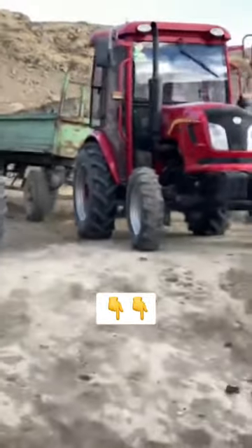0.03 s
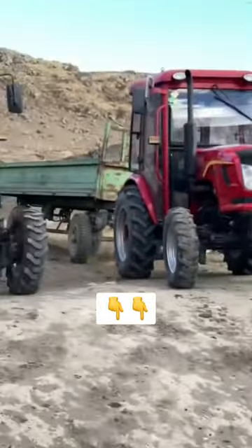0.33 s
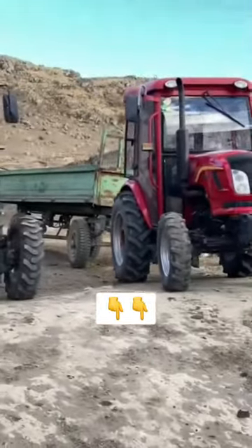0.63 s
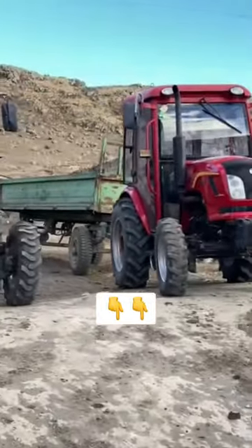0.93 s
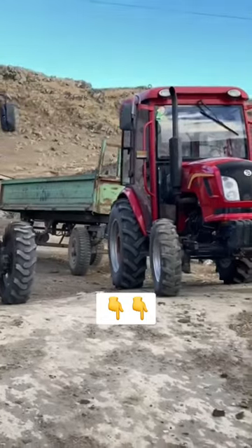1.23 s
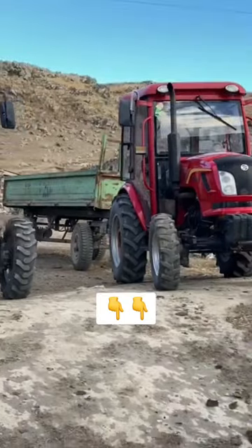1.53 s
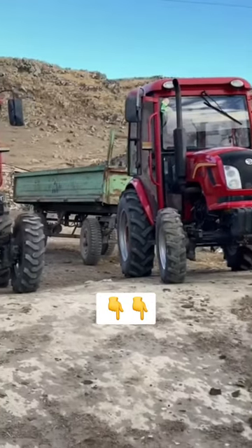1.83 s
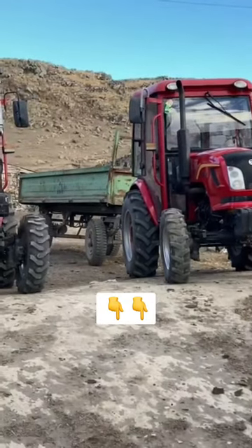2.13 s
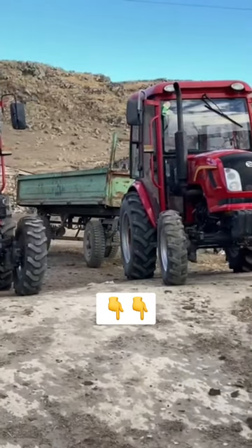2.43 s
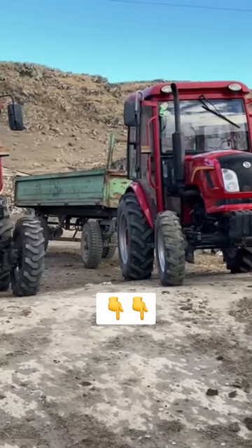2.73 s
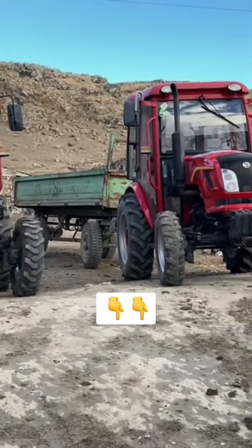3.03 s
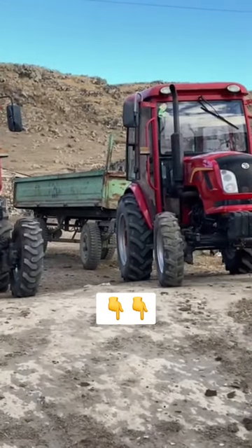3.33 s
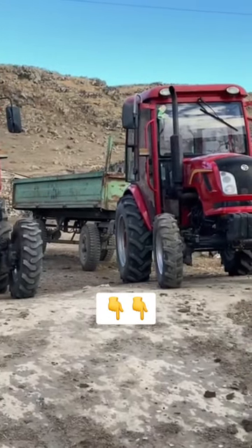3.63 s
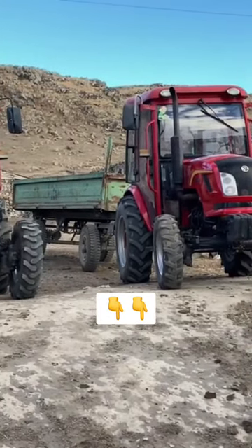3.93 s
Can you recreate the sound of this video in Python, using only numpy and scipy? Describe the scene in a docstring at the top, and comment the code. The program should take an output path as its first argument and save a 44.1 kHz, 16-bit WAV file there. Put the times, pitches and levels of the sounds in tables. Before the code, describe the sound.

A diesel tractor idles with a steady chug, with wind gusts and one hollow metal bang.

```python
"""A four-cylinder diesel tractor idles on open ground: exhaust thuds, combustion knock, injector
clatter and valve hiss, all tied to the crank. Wind buffets the microphone, hardest in the first two
seconds. A second engine drones further off at a wandering speed. One hollow bang rings the trailer's
sheet steel; a few light ticks sound, most of them after it."""
import sys
import numpy as np
from scipy.fft import rfft, irfft, next_fast_len
from scipy.io import wavfile
from scipy.ndimage import map_coordinates

SR = 44100
rng = np.random.default_rng(int(sys.argv[2]) if len(sys.argv) > 2 else 0)


def inscribe(sig):
    """Save sig as 16-bit PCM at rate SR to the path in sys.argv[1].

    A 1-D sig is mono; a 2-D sig holds one channel per row.
    Samples are clipped to [-1, 1] before scaling.
    """
    pcm = np.round(np.clip(np.atleast_2d(sig).T, -1, 1) * 32767)
    wavfile.write(sys.argv[1], SR, pcm.astype(np.int16))


N = 176400

FIRING_HZ, FIRST_FIRING_S, EXHAUST_LAG_FIRINGS = 23.43, -0.004, 0.5096
EXHAUST_DB, KNOCK_DB, CLATTER_DB, HISS_DB = -30.5, -40.5, -41, -47
AIR_DB, RUMBLE_DB, HILLSIDE_DB = -51, -37, -49

# Cylinders in firing order. Each row: knock, clatter and hiss in dB, hiss lag in firings,
# thud in dB, thud lag in firings.
CYLINDERS = [(-27, -5, 7.5, .01, 4.5, 0.0059), (0.5, -2.5, 6.5, 0.1, 0, 0.011), (6.5, -7, -19, .08, 2.5, 0),
             (2, -7.5, 5, 0.082, 3, 0.085)]
# Engine notes. Each row: multiple of the firing rate, relative level in dB.
EXHAUST_PARTIALS = [(1, -49), (2, -7.5), (3, -5.5), (4, 0), (5, -6.5), (6, -25), (7, -22), (8, -26.5)]
DRONE_PARTIALS = [(1, -10.5), (2, 4.5), (3, -1), (4, -18)]
# Block and bonnet resonances. Each row: centre in Hz, width in Hz, gain over the dry path in dB.
BLOCK_MODES = [(622, 11, -28), (993, 71, 3), (1139, 68, -0.5), (1410, 22, 1.5), (2014, 36, 4.5),
               (2590, 88, 1), (2924, 67, 9), (3063, 16, 14.5), (6650, 43, -34)]
# Second engine. Each row: time in seconds, firing rate in Hz, level in dB.
DRONE_TRACK = [(0, 31.91, -30), (1.45, 32.1, -29), (1.8, 31.6, -48), (2.05, 32.5, -26), (2.25, 33.7, -38.5),
               (2.65, 33.72, -35.5), (2.97, 32.65, -23.5), (3.25, 32.97, -28), (3.52, 32.49, -25.5),
               (4, 33.2, -33)]
# Wind buffets. Each row: crest time in seconds, width in seconds, level in dB, upper edge in Hz.
BUFFETS = [(.382, 0.015, -31, 900), (.443, 0.013, -27.5, 480), (0.493, 0.0076, -17.5, 277),
           (.52, 0.012, -30.5, 527), (0.602, 0.014, -23.5, 435), (.745, 0.011, -24, 223),
           (0.806, 0.013, -23.5, 320), (0.883, 0.0056, -35, 420), (1.078, 0.0084, -24.5, 457),
           (1.118, 0.016, -23.5, 430), (1.168, 0.0097, -22, 240), (1.272, 0.0087, -29, 520),
           (1.328, 0.0073, -32.5, 420), (1.42, .018, -33.5, 328), (1.475, 0.0032, -24, 720),
           (1.512, 0.003, -25, 500), (1.556, 0.0076, -29.5, 350), (2.892, 0.0087, -30, 250),
           (2.955, 0.019, -32.5, 206), (3.02, 0.0095, -32.5, 258), (3.093, 0.012, -28, 200),
           (3.14, 0.006, -27, 199), (3.279, 0.006, -25, 301), (3.307, 0.0087, -25.5, 320),
           (3.546, 0.01, -30, 232)]
# Sheet steel. Each row: frequency in Hz, gain in dB, rise in seconds, T60 in seconds.
TRAILER_MODES = [(191, -12.5, 0.052, 0.45), (335, -14.5, 0.0094, .13), (384, -17, 0.01, 0.1),
                 (535, -23.5, 0.0067, 0.32), (585, -15.5, 0.014, 0.12), (759, -27, 0.0065, 0.2),
                 (957, -37, 0.0081, 0.46)]
# Ticks. Each row: start in seconds, gain of ring and crack in dB, gain of snap in dB.
TICKS = [(0.677, -49, -38), (1.8211, -19.5, -51), (2.572, -18, -46), (2.605, -19, -46), (2.6935, -17, -51),
         (3.369, -19, -48)]
# Ring of a tick. Each row: frequency in Hz, relative level in dB, T60 in seconds.
TICK_MODES = [(646, -17, 0.0059), (1320, -1, 0.0027), (2050, 0, 0.0012), (4700, -21.5, 0.00048)]

# Gain curves. Each row: time in seconds, gain in dB.
TRACTOR_GAIN = [(0, 0), (.4, 1.5), (1.1, 0.5), (1.9, 0), (2.6, 0), (3.2, -0.9), (4, -0.5)]
CLATTER_GAIN = [(0, -2.5), (.3, 1), (.8, 0), (1.7, .5), (2.5, -0.5), (3.1, -3), (4, -2.5)]
SIZZLE_GAIN = [(0, -43.5), (.35, -47.5), (.6, -62), (1.5, -94), (4, -88)]
WHISTLE_GAIN = [(0, -63), (1.5, -64), (2.3, -62.5), (2.9, -65), (3.3, -96)]
WIND_GAIN = [(0, -39.5), (.15, -27), (.35, -27.5), (.53, -19.5), (.68, -32), (.78, -26.5), (1.0, -25),
             (1.17, -23.5), (1.45, -26.5), (1.6, -30), (1.9, -31), (2.2, -32), (2.7, -37), (3.05, -30),
             (3.4, -36), (4, -37)]

# Noise spectra. Each row: frequency in Hz, relative density in dB.
KNOCK_SPECTRUM = [(120, -75), (300, 7), (480, 4), (750, 1), (1100, -0.5), (1500, -1), (2000, 0.5),
                  (3000, -26), (6000, -47)]
CLATTER_SPECTRUM = [(700, -35), (1300, 6.5), (1800, 0.5), (2400, 12), (3100, -1.5), (3500, -16.5),
                    (4200, -11.5), (6000, -25), (12000, -25)]
SIZZLE_SPECTRUM = [(2000, -39), (2900, 2.5), (3400, 3), (4000, -12), (5500, -9), (9000, -15)]
HISS_SPECTRUM = [(2000, 6), (4000, -7.5), (6500, 0.5), (12800, 0.5), (15200, 5.5)]
AIR_SPECTRUM = [(1000, 4), (3500, 12), (5000, 2.5), (7500, 9.5), (13000, 5), (15200, 3)]
WIND_SPECTRUM = [(12, -30), (28, -12), (50, 4), (100, -4), (170, -8), (350, -15.5), (600, -36), (1200, -50),
                 (4000, -66)]
RUMBLE_SPECTRUM = [(15, -40), (30, -14), (48, -12.5), (75, 10), (105, 5), (135, -10), (205, -14.5),
                   (300, -7), (700, -18.5), (2000, -77)]
PUFF_SPECTRUM = [(60, 5), (180, 5), (350, 3), (560, -2), (850, -4), (1100, -12), (1500, -10), (3000, -11),
                 (6000, -29), (15000, -38)]
SHUDDER_SPECTRUM = [(90, -23), (200, 7), (330, -2.5), (560, 0), (900, -24), (2000, -11), (6000, -35)]
CRACK_SPECTRUM = [(200, 2), (700, 8), (2000, 11), (4000, -13), (7000, -34), (12000, -52)]
SNAP_SPECTRUM = [(3000, -20), (8000, 1), (14000, 0)]
HILLSIDE_SPECTRUM = [(25, -21), (60, -32), (100, -10), (205, -11), (350, 7.5), (650, 3.5), (900, -15),
                     (2000, -42)]

# Stereo filters. Each row: frequency in Hz, gain in dB.
GROUND_SCATTER = [(200, 0), (600, -3), (1300, 1), (2500, -4.5), (5000, 0), (9000, -9), (12500, -6.5),
                  (15000, -1.5)]  # over the direct sound
LEFT_OVER_RIGHT = [(300, -4), (1100, 2.5), (2200, 1), (4500, -3), (8000, -0.8), (15000, 0.5)]
SIDE_GAIN = [(25, -32), (125, -32), (250, -34.5), (550, -1), (1000, -1), (2200, -8.5), (3500, 4),
             (8000, -1), (15000, 0.5)]


def tractor():
    """Rattle rings the block and arrives direct and off the ground; the exhaust thuds below it."""
    gain = amp(curves(TRACTOR_GAIN)[0])
    engine = block_ring(rattle(gain)) + airy_whistle(gain)
    direct = left_first(engine[0])
    scatter = filtered(engine[1:], lambda hz: gain_at(GROUND_SCATTER, hz))
    pair = filtered(direct + scatter, lambda hz: gain_at(LEFT_OVER_RIGHT, hz) ** np.array([[.5], [-.5]]))
    return pair + gain * amp(EXHAUST_DB) * left_first(exhaust())


def exhaust():
    """One thud a firing; the cylinders push unequally, so the chug lopes."""
    thud_db, thud_lag = np.transpose(CYLINDERS)[4:]
    firings = (clock() - FIRST_FIRING_S) * FIRING_HZ - EXHAUST_LAG_FIRINGS
    by_cylinder = lambda values: np.interp(firings, np.arange(len(values)), values, period=len(values))
    thuds = pulse_train(firings - by_cylinder(thud_lag), EXHAUST_PARTIALS, waver_db=1.2)
    return unit(amp(by_cylinder(thud_db)) * thuds)


def rattle(gain):
    """Combustion knock, injector clatter, valve hiss. Channels: direct, left scatter, right scatter."""
    knock_db, clatter_db, hiss_db, hiss_lag = np.transpose(CYLINDERS)[:4]
    clatter = amp(CLATTER_DB + curves(CLATTER_GAIN)[0]) * noise(CLATTER_SPECTRUM, channels=3)
    clatter += amp(curves(SIZZLE_GAIN)[0]) * noise(SIZZLE_SPECTRUM, channels=3)
    knock_env = strokes(knock_db, lead=.28, rise_s=.0066, decay_s=.018, jitter_db=.4, floor=.99)
    knock = amp(KNOCK_DB) * knock_env * noise(KNOCK_SPECTRUM, channels=3)
    clatter *= strokes(clatter_db, lead=.212, rise_s=.0018, decay_s=.0135, jitter_db=.3, floor=.22)
    hiss_env = strokes(hiss_db, lead=.13, rise_s=.007, decay_s=.013, jitter_db=1, floor=.2, lags=hiss_lag)
    hiss = amp(HISS_DB) * hiss_env * noise(HISS_SPECTRUM, channels=3)
    return gain * (knock + hiss) + clatter


def strokes(cylinder_db, lead, rise_s, decay_s, jitter_db, floor, lags=(0, 0, 0, 0)):
    """Envelope: one burst a firing over a steady floor. Lead and lags in firings."""
    power, t = np.zeros(N), clock()
    for k in range(-1, int(N / SR * FIRING_HZ) + 2):
        cylinder = k % len(CYLINDERS)
        start_s = FIRST_FIRING_S + (k - lead + lags[cylinder]) / FIRING_HZ
        part = slice(max(int(start_s * SR), 0), int(start_s * SR) + SR // 8)
        strength = amp(cylinder_db[cylinder] + jitter_db * rng.normal())
        power[part] += (strength * burst(t[part] - start_s, rise_s, decay_s)) ** 2
    return unit(np.sqrt(power + floor ** 2 / 2))


def block_ring(x):
    """Block and bonnet resonances colour x at unchanged rms."""
    modes = lambda hz: sum(amp(db) * 1j * hz * width_hz / (mode_hz ** 2 - hz ** 2 + 1j * hz * width_hz)
                           for mode_hz, width_hz, db in BLOCK_MODES)
    return x.std() * unit(filtered(x, lambda hz: 1 + modes(hz)))


def airy_whistle(gain, centre_hz=6050, half_width_hz=140):
    """The tractor's continuous hiss and a thin, wavering whistle."""
    peak = lambda hz: 1 / (1 + ((hz - centre_hz) / half_width_hz) ** 2)
    whistle = unit(filtered(rng.standard_normal((3, N)), peak))
    air = gain * amp(AIR_DB) * noise(AIR_SPECTRUM, channels=3)
    return air + amp(curves(WHISTLE_GAIN)[0] + wobble(25.3)) * whistle


def wind(low_edge_hz=130, flutter_db=3.7):
    """Wind on the microphone: a lumpy low flutter with short, ragged buffets."""
    out = amp(curves(WIND_GAIN)[0]) * unit(amp(flutter_db * wobble(35)) * noise(WIND_SPECTRUM))
    for crest_s, width_s, db, edge_hz in BUFFETS:
        band = lambda hz: hz ** 3 / (hz ** 3 + low_edge_hz ** 3) / (1 + (hz / edge_hz) ** 4.85)
        swell = np.exp(-.5 * ((clock() - crest_s) / width_s) ** 2)
        out += amp(db) * ragged(swell, filtered(rng.standard_normal(N), band))
    return out


def far_engine():
    """Only the low drone and rumble of the second engine carry."""
    firing_hz, level_db = curves(DRONE_TRACK)
    drone = pulse_train(np.cumsum(firing_hz) / SR, DRONE_PARTIALS, waver_db=1.3)
    return amp(level_db) * drone + amp(RUMBLE_DB) * noise(RUMBLE_SPECTRUM)


def trailer_bang(start_s=1.686, puff_db=-14, shudder_db=-24):
    """A hollow bang on sheet steel: a puff, shuddering loose panels, modes that swell and ring."""
    age_s = clock() - start_s
    puff = ragged(burst(age_s, rise_s=.02, decay_s=.026), noise(PUFF_SPECTRUM))
    shudder = ragged(burst(age_s, rise_s=.04, decay_s=.115), noise(SHUDDER_SPECTRUM))
    out = amp(puff_db) * puff + amp(shudder_db) * shudder
    for hz, db, rise_s, t60_s in TRAILER_MODES:
        phase = 2 * np.pi * hz * age_s + .82 * wobble(60)
        out += amp(db) * burst(age_s, rise_s, t60_s / np.log(1000)) * np.sin(phase)
    return out


def ticks(crack_db=-8, crack_decay_s=.0018, snap_decay_s=.0019):
    """Dry ticks, like grit hitting metal: a crack, a bright snap and a very short ring."""
    out, age_s = np.zeros(N), np.arange(SR // 20) / SR
    crack, snap = noise(CRACK_SPECTRUM)[0], noise(SNAP_SPECTRUM)[0]
    ring = sum(amp(db - 60 * age_s / t60_s) * np.sin(2 * np.pi * hz * age_s)
               for hz, db, t60_s in TICK_MODES)
    for start_s, db, snap_db in TICKS:
        part = slice(int(start_s * SR), int(start_s * SR) + len(age_s))
        out[part] += amp(db) * (ring + amp(crack_db) * np.exp(-age_s / crack_decay_s) * crack[part])
        out[part] += amp(snap_db) * np.exp(-age_s / snap_decay_s) * snap[part]
    return out


def hillside():
    """Diffuse engine sound off the hillside, as steady noise."""
    return amp(HILLSIDE_DB) * noise(HILLSIDE_SPECTRUM, channels=2)


def left_first(x, lead_s=0.0001677):
    """Sound from the tractor's side arrives on the left just before the right."""
    return filtered(x, lambda hz: np.exp(1j * np.pi * hz * lead_s * np.array([[1], [-1]])))


def pulse_train(firings, partials, waver_db):
    """Soft pulses, one a firing, with wavering partials."""
    return unit(sum(amp(db + waver_db * wobble(17)) * np.cos(2 * np.pi * k * firings)
                    for k, db in partials))


def ragged(envelope, x, flutter_db=3):
    """Noise x fluttering under an envelope, with the envelope's energy."""
    shaped = envelope * amp(flutter_db * wobble(110)) * x
    return unit(shaped) * np.sqrt(np.mean(envelope ** 2))


def burst(age_s, rise_s, decay_s):
    """Quick rise and exponential fall, from age 0."""
    age_s = np.maximum(age_s, 0)
    return (1 - np.exp(-(age_s / rise_s) ** 2)) * np.exp(-age_s / decay_s)


def noise(spectrum, channels=1):
    """Coloured noise of rms 1."""
    return unit(filtered(rng.standard_normal((channels, N)), lambda hz: gain_at(spectrum, hz)))


def wobble(knot_hz):
    """Smooth random curve, rms near 1."""
    return map_coordinates(rng.standard_normal(int(N * knot_hz / SR) + 4), [clock() * knot_hz])


def filtered(x, response):
    """x through a complex frequency response."""
    size = next_fast_len(N + SR // 2)
    return irfft(rfft(x, size) * response(np.fft.rfftfreq(size, 1 / SR)), size)[..., :N]


def gain_at(points, hz):
    """Gain from (Hz, dB) points on a log frequency axis."""
    point_hz, db = np.transpose(points)
    return amp(np.interp(np.log(hz + 1), np.log(point_hz + 1), db))


def curves(rows):
    """One value per sample for each column after the time."""
    times_s, *columns = np.transpose(rows)
    return [np.interp(clock(), times_s, column) for column in columns]


def clock():
    """Sample times in seconds."""
    return np.arange(N) / SR


def amp(db):
    """Decibels to gain."""
    return 10 ** (np.asarray(db) / 20)


def unit(x):
    """x at rms 1."""
    return x / np.sqrt(np.mean(x ** 2) + 1e-20)


def scene():
    """Both engines, wind, bang and ticks in stereo."""
    return tractor() + hillside() + left_first(far_engine() + wind() + trailer_bang() + ticks())


def record(dry, top_hz=15850):
    """Stereo width set by frequency, bass nearly mono; nothing above top_hz."""
    mid = (dry[0] + dry[1]) / 2
    side = filtered((dry[0] - dry[1]) / 2, lambda hz: gain_at(SIDE_GAIN, hz))
    return filtered(np.array([mid + side, mid - side]), lambda hz: hz < top_hz)


dry = scene()
out = record(dry)
inscribe(out)
```